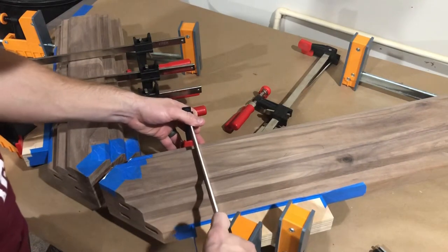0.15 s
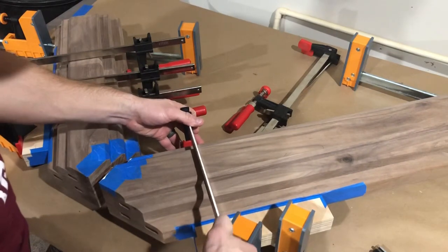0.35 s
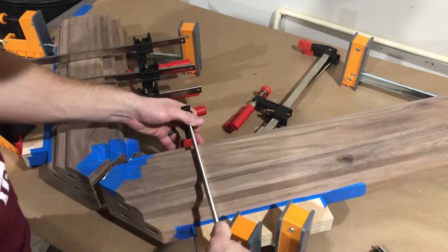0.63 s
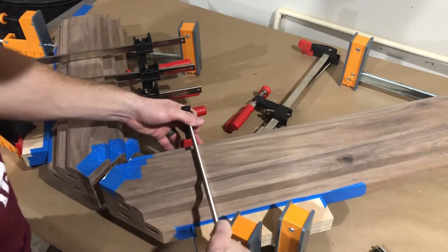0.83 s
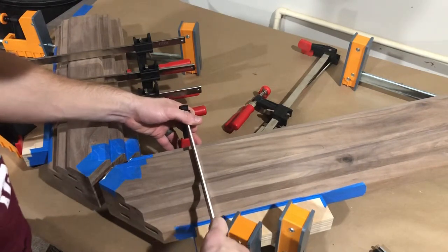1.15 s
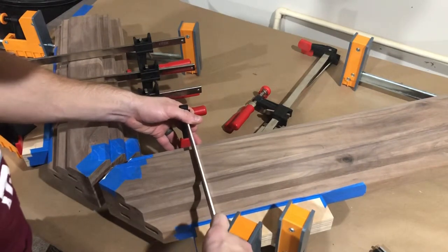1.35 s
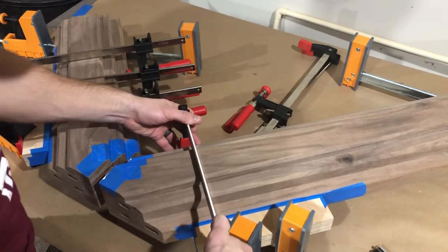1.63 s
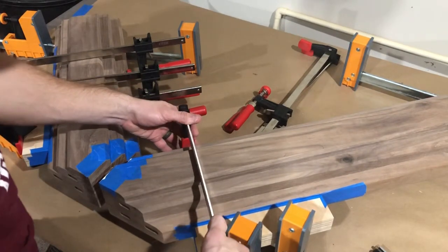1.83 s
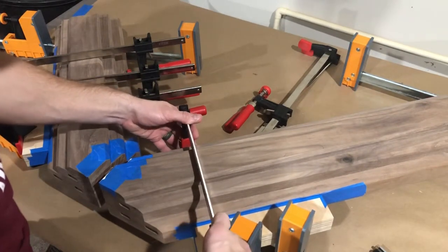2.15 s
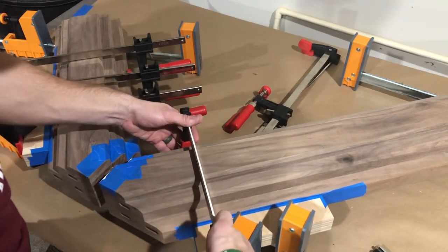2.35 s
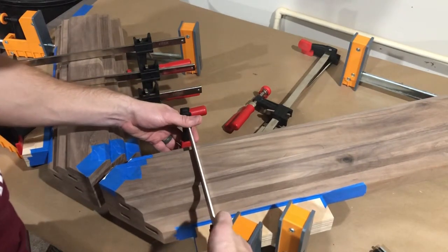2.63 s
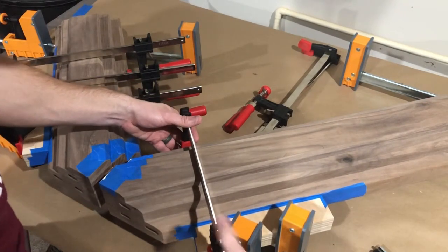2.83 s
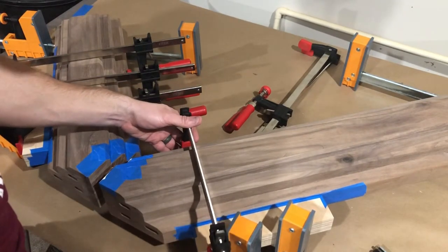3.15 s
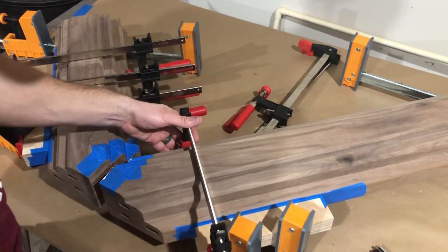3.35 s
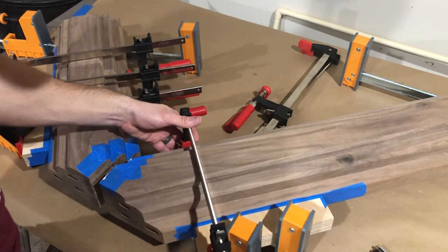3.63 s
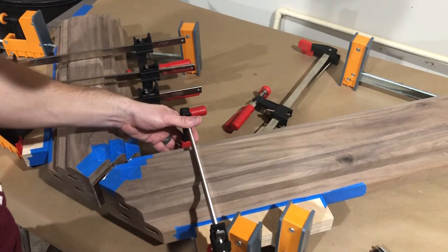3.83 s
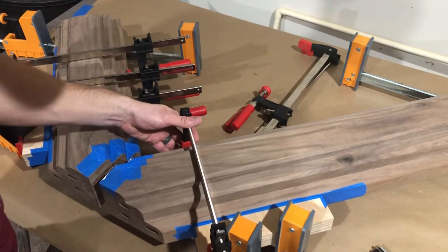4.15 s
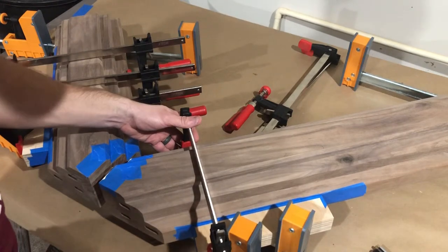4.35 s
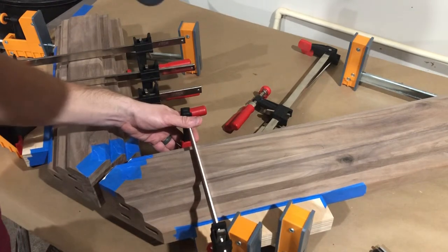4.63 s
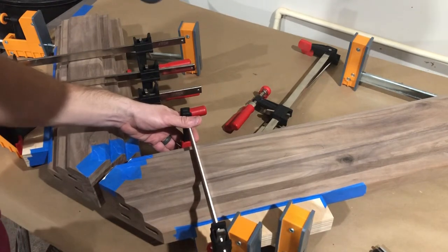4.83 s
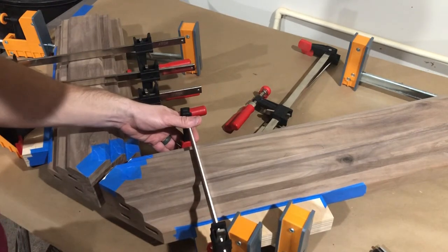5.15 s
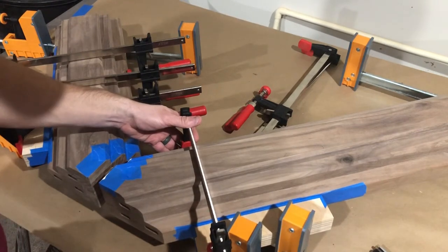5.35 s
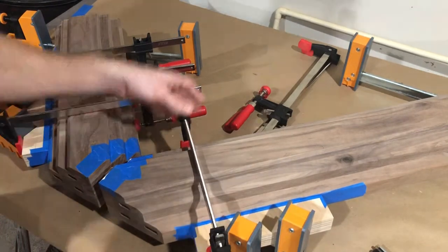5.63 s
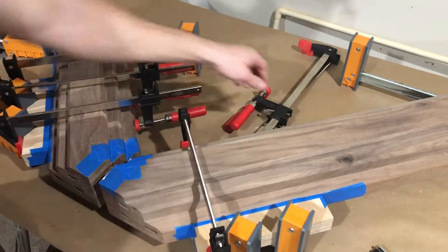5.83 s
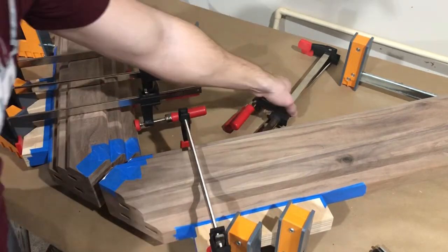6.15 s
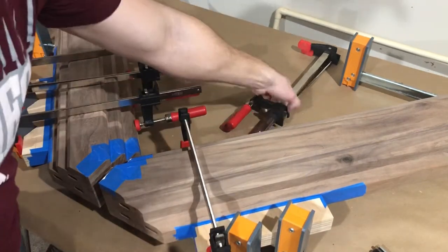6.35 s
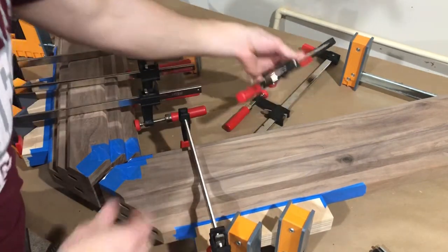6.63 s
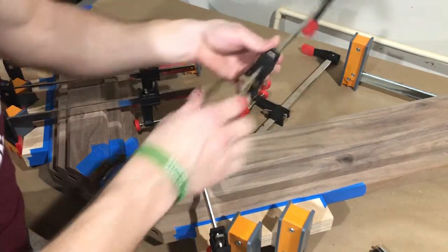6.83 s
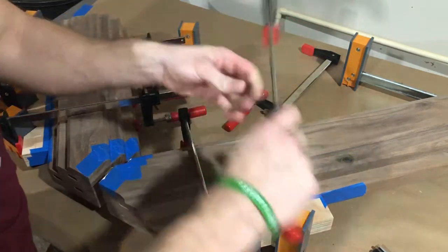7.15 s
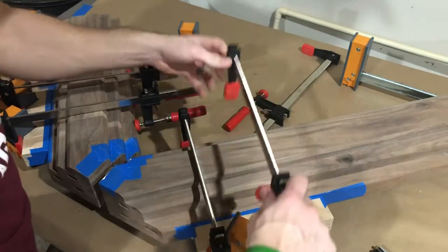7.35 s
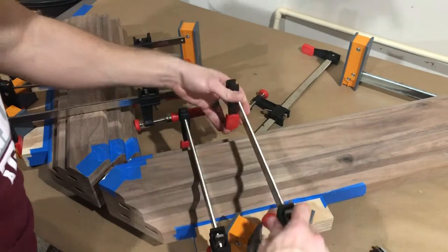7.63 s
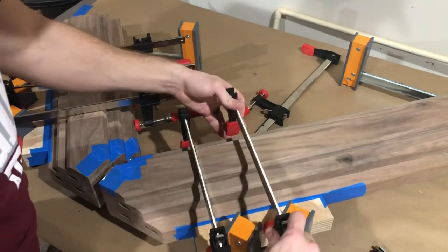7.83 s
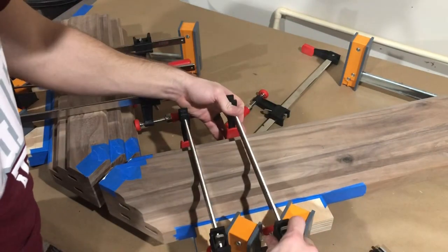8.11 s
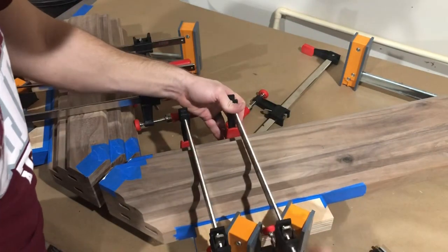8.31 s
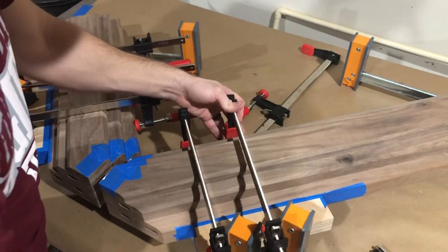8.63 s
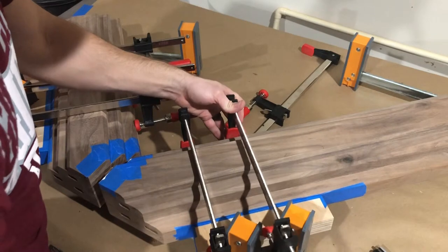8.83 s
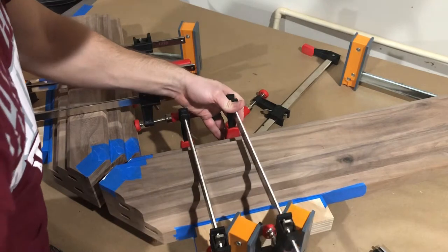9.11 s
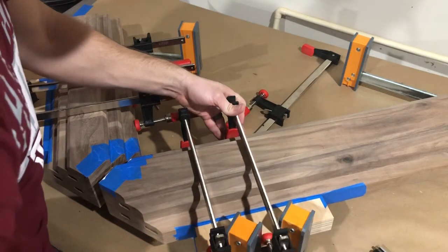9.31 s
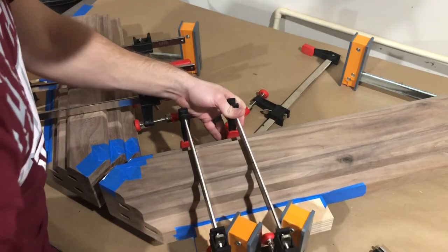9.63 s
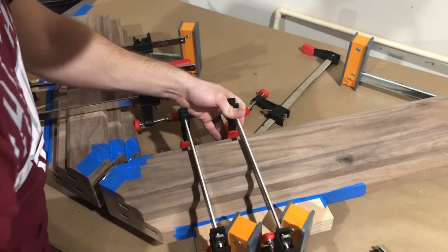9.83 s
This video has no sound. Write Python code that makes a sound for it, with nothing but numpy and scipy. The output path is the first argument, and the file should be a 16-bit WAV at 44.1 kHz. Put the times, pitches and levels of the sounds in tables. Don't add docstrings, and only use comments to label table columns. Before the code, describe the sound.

Close clamp handling on a workbench: steel clicks, woody thuds, a tearing scrape, bright ratchet snaps and brief screw chirps in a reverberant shop.

```python
import sys
import numpy as np
from scipy import signal
from scipy.fft import rfft, irfft
from scipy.io import wavfile
from scipy.ndimage import uniform_filter1d

SR = 44100
rng = np.random.default_rng(int(sys.argv[2]) if len(sys.argv) > 2 else 0)


def to_linear_factor(level_db):
    exponent = np.asarray(level_db, float) / 20
    return 10 ** exponent


def persist_wave(psi):
    counts = np.round(np.clip(psi, -1, 1) * 32767).astype(np.int16)
    wavfile.write(sys.argv[1], SR, np.atleast_2d(counts).T)


N = 440118
BLOW_SAMPLES, LEAD_SAMPLES = 16384, 512


def colour(x, points):
    hz, db = np.transpose(points)
    f_hz = np.maximum(np.fft.rfftfreq(len(x), 1 / SR), 1)
    gain = to_linear_factor(np.interp(np.log(f_hz), np.log(hz), db))
    y = irfft(rfft(x) * gain, len(x))
    return y / np.sqrt(np.mean(y ** 2))


def curve(points):
    t_s, db = np.transpose(points)
    return to_linear_factor(np.interp(np.arange(N) / SR, t_s, db, left=-200, right=-200))


def swells(moves, fade):
    t_s = np.arange(0, N + 64, 64) / SR
    peak_s, db, rise_s = np.transpose(moves)[:, :, None]
    late = (t_s - peak_s) / np.maximum(rise_s, .005)
    fall_db = 20 * np.maximum(-late, late / fade)
    return np.interp(np.arange(N) / SR, t_s, to_linear_factor(db - fall_db).sum(axis=0))


def walk(rate_hz):
    hold = int(SR / rate_hz)
    steps = np.repeat(rng.standard_normal(N // hold + 1), hold)
    return 1.3 * uniform_filter1d(uniform_filter1d(steps, hold), hold)[:N]


def grit(rate_hz, spread_db):
    slips = (rng.random(N) < rate_hz / SR) * rng.standard_normal(N)
    return slips * to_linear_factor(spread_db * np.minimum(rng.exponential(size=N), 3))


def resonate(x, peaks):
    y = 0
    for hz, width_hz, db in peaks:
        b, a = signal.iirpeak(hz, hz / width_hz, SR)
        y = y + to_linear_factor(db) * signal.lfilter(b, a, x) / np.sqrt(width_hz)
    return y / y.std()


def rings(modes, chance, scatter_db):
    hz, db, t60_s = np.transpose(modes)[:, :, None]
    jw = 2j * np.pi * np.fft.rfftfreq(BLOW_SAMPLES, 1 / SR)
    loss = np.log(1000) / t60_s
    strength = to_linear_factor(db + scatter_db * chance[:len(modes), None])
    gain = strength * np.sign(chance[-len(modes):, None])
    w = 2 * np.pi * hz
    return np.sum(gain * w / ((jw + loss) ** 2 + w ** 2), axis=0)


def burst(noise, shape):
    spectrum = rfft(noise * np.sqrt(shape))
    even = irfft(spectrum / np.abs(spectrum)) * np.sqrt(shape)
    return even / np.sqrt(np.sum(even ** 2) / np.sum(shape ** 2))


def add(out, t_s, sound, db, hold_s):
    sound = np.roll(sound, LEAD_SAMPLES) * np.clip(np.linspace(4, -.2, BLOW_SAMPLES), 0, 1)
    top = np.sqrt(uniform_filter1d(sound ** 2, int(hold_s * SR)).max())
    i = int(t_s * SR) - LEAD_SAMPLES
    out[i:i + len(sound)] += (sound * to_linear_factor(db) / top)[:N - i]


# f/Hz, level/dB per Hz
AIR_COLOUR = [(25, -6.5), (48, -1), (70, 2.5), (349, -7.5), (553, -12), (1980, -26), (15200, -33),
              (16500, -45)]


def air():
    return to_linear_factor(-65 + 1.0 * walk(1.5)) * colour(rng.standard_normal(N), AIR_COLOUR)


# f/Hz, level/dB, t60/s
BENCH_MODES = [(65.1, 2.5, 0.7), (146.2, -6.5, 0.17), (232, -4, 0.14), (315.5, -8, 0.082),
               (355, 1.5, 0.083), (468, 5, 0.03), (544.3, -3, 0.075), (625.6, 2, 0.053), (719, -1, 0.054),
               (817.4, -9.5, 0.086), (908, -4, 0.058), (1027, -10, 0.033), (1202, -7.5, 0.055),
               (1382, -6.5, 0.055)]
# peak t/s, level/dB, 20 dB swell/s
RUMBLES = [(0.01, -53.5, 0.13), (.47, -61.5, 0.3), (.66, -66, -0.2), (1.1, -65, 0.1), (1.55, -65.5, 0.76),
           (2.2, -52, -0.47), (2.4, -49, -0.0165), (2.75, -55, -0.32), (3.35, -57, 0.2), (4.14, -57.5, 0.14),
           (4.72, -44.5, 0.09), (5.39, -62, 0.28), (5.98, -51.5, 0.02), (6.25, -53, 0.18),
           (6.45, -47.5, 0.1042), (7.09, -56, -1.62), (7.34, -61, 0.26), (8.02, -43, -0.08),
           (8.73, -57, -0.3), (8.84, -49, 0), (9.39, -61.5, 0.6), (9.67, -52, -0.05)]
# peak t/s, level/dB, 20 dB swell/s
BRUSHES = [(0.01, -66.5, 0.25), (.47, -66, -0.3), (.64, -71.5, -0.87), (1.15, -86, .5), (1.61, -70, 0.33),
           (2.43, -54.5, 0.16), (3.4, -75, 0.46), (3.62, -85.5, 2.3), (4.14, -73.5, 0.3),
           (4.6, -73.5, 0.16), (4.78, -74.5, 0.27), (5.4, -73, 0.1), (6.05, -48, 0.13), (6.25, -68.5, 0.63),
           (6.5, -80, 0.3), (6.78, -70.5, 0.2), (6.9, -68, 0.44), (7.32, -64, 0.35), (8.12, -72.5, 0.3),
           (8.78, -63, 0.1), (9.1, -66, .15), (9.39, -69, 0.55), (9.68, -73, 0), (9.97, -83, 0.7)]
# f/Hz, level/dB per Hz
RUSTLE_COLOUR = [(470, -34), (800, 3), (2180, -2), (4080, -3.5), (7080, -7.5), (15000, -16), (16000, -16)]


def hands():
    modes = BENCH_MODES[1:]
    body = irfft(rings(modes, np.ones(len(modes)), scatter_db=0))
    pushes = colour(grit(500, spread_db=1.5), [(60, -13.0), (150, 1.5), (500, -6.5), (1500, -18.5)])
    rumble = signal.fftconvolve(pushes, body)[:N]
    rustle = colour(grit(8000, spread_db=-3.0), RUSTLE_COLOUR) * to_linear_factor(1.6 * walk(25))
    rumbling = swells(RUMBLES, fade=1.77) * rumble / rumble.std()
    return rumbling + swells(BRUSHES, fade=1.1) * rustle


# t/s, peak level/dB, ring f/Hz, rattle/s
CLICKS = [(0.054, -49, 6140, 0.0015), (0.0575, -52, 6000, 0.0089), (0.346, -42.5, 6000, 0.017),
          (0.4256, -42, 3500, 0.006), (0.437, -43.5, 7530, 0.011), (2.963, -79, 4370, .004),
          (4.361, -52, 4820, 0.0019), (4.68, -55, 5840, 0.002), (4.9385, -63, 9000, 0.0034),
          (5.345, -65, 3950, 0.052), (5.821, -52, 8030, 0.0043), (5.8565, -45, 2560, 0.0017),
          (5.9634, -37, 2580, 0.0034), (6.2274, -37, 8200, 0.0046), (7.191, -52.5, 4300, 0.0044),
          (7.2359, -41.5, 8000, 0.0077), (7.241, -42, 6130, 0.0057), (7.28, -40, 6700, 0.0076),
          (7.293, -49.5, 6300, 0.0067), (8.063, -45, 4500, 0.022), (8.457, -69, 9000, .015),
          (8.7238, -36, 7040, 0.002), (8.764, -42.5, 6160, 0.0023), (8.8205, -44, 4000, 0.004),
          (8.8262, -56, 11400, 0.0021), (9.053, -47.5, 5590, 0.00098)]
# t/s, peak level/dB, ring f/Hz, rattle/s, brightness/dB
SNAPS = [(0.3165, -26.5, 5480, 0.011, 2.5), (1.438, -39.5, 8450, 0.004, 1),
         (4.649, -29.5, 1310, 0.0038, -19), (7.957, -44.5, 1900, 0.0092, -37),
         (7.9683, -26.5, 6500, 0.0032, 6.5), (7.969, -63, 15000, 0.0039, 22),
         (7.9768, -22.5, 5830, 0.0027, 5.5), (8.675, -27.5, 9000, 0.0045, 6.5),
         (8.7188, -36, 6100, 0.003, 1.5), (9.0659, -27, 7600, 0.0012, 6), (9.2773, -40, 7000, 0.007, -3.5),
         (9.2945, -28, 4200, 0.0012, 1.5), (9.5053, -29, 6740, 0.0038, -3.5)]
# t/s, peak level/dB, ring f/Hz
TICKS = [(1.159, -64, 2560), (2.149, -66, 4200), (2.1564, -60.5, 5170), (3.2064, -64.5, 3200),
         (3.283, -56.5, 4130), (3.4094, -64, 5440), (4.0812, -60, 2720), (4.096, -59, 2740),
         (4.105, -58, 2740), (4.12, -62, 2550), (4.227, -69, 2530), (6.4718, -50, 5830),
         (6.7338, -56, 3320), (7.0476, -51, 4180), (7.133, -54, 3250), (7.1476, -49.5, 4500),
         (7.4825, -57.5, 4500), (7.73, -63, 2520), (8.998, -58, 5630)]
# t/s, peak level/dB, ring f/Hz, rattle/s, brightness/dB
FLECKS = [(5.8700, -42, 3060, .003, 1), (5.8768, -41.5, 2700, .003, 1), (5.8883, -34.5, 3280, .003, 2),
          (5.8955, -36.5, 2400, .004, -3), (5.974, -39, 6500, .002, 0), (5.829, -55, 1920, .003, -6),
          (5.70, -73, 8000, .05, 7), (5.728, -68, 7700, .004, 4), (3.6157, -73, 14000, .01, 8),
          (3.8537, -70, 14000, .01, 8), (4.0392, -67, 13100, .01, 6), (4.2019, -69, 8870, .03, 6),
          (4.7771, -68, 3760, .004, 0), (6.4054, -59, 4260, .004, -5), (6.5126, -60, 2600, 0.0042, -7),
          (6.612, -59, 6200, .005, -5), (6.798, -60, 4000, .004, 2), (6.9142, -60, 3220, .004, -2),
          (7.1148, -58, 2690, .004, -4), (7.164, -58, 4500, .004, -3), (9.017, -61, 4000, 0.0028, -3),
          (9.269, -56, 3000, .006, -5), (2.312, -46, 6000, .006, 2), (2.331, -34.5, 8000, .004, 3),
          (8.728, -38, 7200, .006, 3), (7.984, -42, 1800, .004, -8), (8.658, -62, 1800, .01, -15),
          (5.35, -66, 9000, .03, 6)]
# f/Hz, level/dB, t60/s
BAR_MODES = [(2220, -6.5, 0.075), (3660, 17, 0.03), (4430, -24, .12), (5240, -4.5, .12), (5460, -10, 0.056),
             (5740, 5.5, 0.27), (7084, 8, .1), (7510, 23.5, 0.029), (8350, 3, 0.27), (8600, -3, 0.082),
             (10300, -11, .12), (12200, 7, 0.067), (13570, -5.5, 0.125)]


def clicks():
    rows = SNAPS + FLECKS
    rows = rows + [(*row, -4) for row in CLICKS]
    rows = rows + [(*row, 0.0053, -7.5) for row in TICKS]
    out, t_s = np.zeros(N), np.arange(BLOW_SAMPLES) / SR
    log_f = np.log(np.fft.rfftfreq(BLOW_SAMPLES, 1 / SR) + 1)
    tilt_f = np.log([500, 2000, 5000, 12000, 17000])
    for start_s, db, hz, rattle_s, bright_db in rows:
        noise, luck = rng.standard_normal(BLOW_SAMPLES), rng.standard_normal(40)
        rattle = burst(noise, np.exp(-t_s / max(rattle_s / 2, 1e-4)) * (1 - np.exp(-t_s / .0003)))
        rattle[12] += 1.6
        tilt_db = [-16.5 - bright_db, -2 - bright_db, 0, bright_db - 7, bright_db - 10]
        tilt = to_linear_factor(np.interp(log_f, tilt_f, tilt_db))
        crack = 1 + 1.23 * np.exp(-((log_f - np.log(hz)) / 0.28) ** 2)
        local = rings([(hz, 73.5, 0.0051)], np.ones(1), scatter_db=0)
        near = np.exp(-((log_f - np.log(hz)) / 1.7) ** 2) + 1.1
        bar = to_linear_factor(33.5) * near * rings(BAR_MODES, luck, scatter_db=2)
        sound = irfft(rfft(rattle) * tilt * (crack + local + bar))
        add(out, start_s - .0005, sound, db, hold_s=.002)
    return out


# t/s, peak level/dB, f/Hz, t60/s
CHINKS = [(0.318, -37.5, 7500, .04), (6.2266, -51, 7650, .03), (6.441, -52, 5620, 0.026),
          (6.472, -46.5, 5550, 0.026), (6.471, -51, 8200, 0.024), (7.243, -49, 5700, 0.037),
          (7.281, -48, 6300, .04), (8.652, -71, 8200, 0.013), (8.6742, -22.5, 8300, 0.015),
          (8.674, -31, 5730, 0.018), (8.72, -37, 5950, 0.036), (8.726, -37, 7270, .02),
          (9.3003, -39, 4030, 0.0071), (9.506, -31, 212, .09), (9.502, -28.5, 740, 0.014),
          (3.208, -51, 1274, 0.066), (3.284, -52.5, 926, 0.054), (8.592, -48.5, 608, 0.032),
          (4.651, -40, 1400, 0.043), (.319, -44.5, 910, 0.033)]
# t/s, peak level/dB, f/Hz, t60/s
PINGS = [(2.296, -44, 11400, .05), (2.311, -45, 11400, .05), (2.321, -40, 13300, .08),
         (9.0659, -32, 11700, .005), (9.07, -47.5, 759, 0.028), (9.2945, -38, 6300, .004),
         (9.504, -46.5, 9300, 0.068), (9.504, -48, 10200, 0.073), (6.735, -61, 2200, .03),
         (3.283, -61.5, 7200, 0.034), (0.054, -58.5, 1800, .05), (1.253, -69, 5700, .012),
         (6.515, -49, 585, 0.065), (7.282, -48, 7000, .06), (.33, -47, 800, 0.046), (.352, -46, 605, .06),
         (9.525, -42, 640, .05), (2.346, -37, 720, .06), (8.826, -44, 11800, .006),
         (9.277, -42, 11500, .012), (7.968, -36, 14500, .012), (8.6745, -36, 13600, .005),
         (8.738, -47, 860, .05), (8.81, -50, 860, .05), (.318, -46, 8600, .1), (.318, -47, 10400, .1),
         (.4265, -50, 7500, .12), (7.977, -38, 14700, .015), (4.655, -50, 1800, .03),
         (9.053, -54, 5600, .012), (6.2255, -46, 11900, .02), (.648, -58, 900, .03), (.67, -55, 330, .08),
         (.71, -56, 600, .05), (1.455, -54, 600, .06), (1.48, -56, 350, .07), (9.29, -52, 750, .05),
         (7.24, -50, 12500, .01), (7.28, -50, 12500, .01), (4.36, -60, 14000, .006), (2.45, -48, 290, .1)]


def chinks():
    out = np.zeros(N)
    for rows, split in ((CHINKS, 0.036), (PINGS, 0.012)):
        for start_s, db, hz, t60_s in rows:
            luck = rng.standard_normal(12)
            cluster = [(hz * (1 + split * step), 0, t60_s) for step in luck[4:8]]
            add(out, start_s, irfft(rings(cluster, luck, scatter_db=2)), db, hold_s=.002)
    return out


# f/Hz, t60/s
SHOP_T60 = [(100, 0.74), (400, 0.75), (1500, 0.71), (5000, 0.54), (9000, 0.42), (12000, .36), (15500, 0.3)]


def shop():
    t_s, (hz, t60_s), tail = np.arange(SR) / SR, np.transpose(SHOP_T60), 0
    octave = np.log2(np.fft.rfftfreq(SR, 1 / SR) + 1)
    echoes = rfft(rng.standard_normal(SR))
    for centre in np.arange(5, 15, .5):
        band = irfft(echoes * np.clip(1 - 2 * np.abs(octave - centre), 0, 1))
        tail = tail + band * to_linear_factor(-60 * t_s / np.interp(centre, np.log2(hz), t60_s))
    gap_s = 0.0026
    tail = tail * np.clip(t_s / gap_s - 1, 0, 1)
    return to_linear_factor(-8) * tail / np.sqrt(np.sum(tail ** 2))


# t/s, peak level/dB, ring f/Hz, hardness/dB
KNOCKS = [(0.318, -43, 433, 6), (0.357, -45, 625, 0), (0.648, -50, 610, -15.5), (0.69, -53.5, 341, -17),
          (1.45, -51, 216, -0.5), (2.157, -51.5, 610, 18), (2.297, -43.5, 596, -1), (2.346, -29, 600, -23),
          (2.388, -34.5, 355, -24), (3.209, -47, 652, -7), (3.324, -49, 238, -12), (4.097, -51.5, 148, -2),
          (4.652, -30.5, 912, -7.5), (4.69, -43.5, 154, -11), (5.34, -61.5, 264, 20.5),
          (7.982, -36.5, 149, -18.5), (8.077, -39, 302, -16.5), (8.594, -47, 350, -15),
          (8.685, -43, 497, -2.5), (8.736, -41, 545, 0), (8.769, -47, 670, 1), (8.81, -50, 350, 1),
          (8.859, -56, 790, -8), (9.076, -47, 484, -2.5), (9.284, -49, 532, -7), (9.503, -35.5, 479, -6),
          (9.722, -47, 237, -2)]
# t/s, peak level/dB, ring f/Hz, leg thump/dB
BUMPS = [(1.16, -59.5, 380, -8), (1.576, -56.5, 620, -22), (3.715, -65.5, 143, -1),
         (3.917, -51.5, 206, -12), (4.227, -64, 123, 2.5), (4.538, -46, 212, -8.5),
         (5.146, -58.5, 168, -16), (6.176, -46, 131, -15), (6.235, -48.5, 244, -29),
         (6.31, -43.5, 147, -40), (6.354, -42.5, 278, -31), (6.431, -45, 287, -32),
         (6.514, -42.5, 265, -16), (7.733, -56, 356, -15), (7.96, -44.5, 358, -8), (6.09, -48, 138, -23),
         (6.545, -45, 140, -28), (6.325, -46, 191, -30), (6.385, -46, 240, -30), (7.15, -57.5, 350, -20),
         (9.525, -39, 195, -30), (9.675, -45.5, 200, -30), (6.46, -48, 300, -30)]


def knocks():
    out, t_s = np.zeros(N), np.arange(BLOW_SAMPLES) / SR
    log_f = np.log(np.fft.rfftfreq(BLOW_SAMPLES, 1 / SR) + 1)
    tilt_f = np.log([35, 75, 160, 400, 1000, 3000])
    # t/s, level/dB, f/Hz, hardness/dB, leg thump/dB, push/s
    rows = [(s, db, hz, hard_db, -27 - 0.4 * (db + 45), 0.00023) for s, db, hz, hard_db in KNOCKS]
    rows += [(s, db, hz, -21, legs_db, 0.00028) for s, db, hz, legs_db in BUMPS]
    for start_s, db, hz, hard_db, legs_db, push_s in rows:
        noise, luck = rng.standard_normal(BLOW_SAMPLES), rng.standard_normal(40)
        push = t_s * np.exp(-t_s / push_s)
        tilt_db = [legs_db - 20, legs_db, 0, 0, hard_db + 13.0, hard_db + 7.5]
        tilt = to_linear_factor(np.interp(log_f, tilt_f, tilt_db))
        thud = to_linear_factor(-83.5) * rfft(burst(noise, np.exp(-t_s / 0.025)))
        spot = rings([(hz, 12.5, .05)], luck, scatter_db=0)
        bench = rings(BENCH_MODES, luck, scatter_db=3)
        ring = irfft(rfft(push) * tilt * (bench + spot + thud))
        spread_s = 0.0017
        add(out, start_s, ring * (1 - np.exp(-t_s / spread_s)), db, hold_s=.006)
    return out


# t/s, level/dB
SLIDE = [
    (2.282, -84),
    (2.297, -43),
    (2.305, -57),
    (2.321, -39),
    (2.326, -47),
    (2.331, -35),
    (2.34, -32.5),
    (2.348, -33),
    (2.356, -52),
]
# f/Hz, width/Hz, level/dB
SLIDE_RINGS = [(3200, 900, -6.5), (4500, 2300, 3.5), (9000, 5500, -1.5)]


def slide():
    return curve(SLIDE) * resonate(grit(9000, spread_db=3.0), SLIDE_RINGS)


# t/s, level/dB
SCRAPE = [
    (5.78, -72.5),
    (5.824, -57),
    (5.842, -58),
    (5.868, -51.5),
    (5.9, -37),
    (5.932, -43),
    (5.982, -32.5),
    (6.002, -40.5),
    (6.08, -58),
]
# f/Hz, level/dB per Hz
SCRAPE_COLOUR = [(410, -19), (1060, -12), (1170, -3.5), (1440, -4), (2160, -0.5), (3840, -10), (7490, -10),
                 (16000, -15.5)]


def scrape():
    return curve(SCRAPE) * to_linear_factor(2.2 * walk(90)) * colour(grit(12000, spread_db=0.7), SCRAPE_COLOUR)


# t/s, level/dB
CARRY = [
    (6.1, -64),
    (6.352, -66.5),
    (6.63, -69.5),
    (6.695, -79),
    (6.76, -67.5),
    (6.95, -68.5),
    (7.07, -75),
    (7.344, -59),
    (7.54, -90),
]
# f/Hz, width/Hz, level/dB
CARRY_RINGS = [(3400, 700, -4.5), (4340, 700, -1), (7100, 600, -9.5)]


def carry():
    patch, rub, hiss = walk(12), grit(6000, spread_db=1.5), 0
    for k, ring in enumerate(CARRY_RINGS):
        level_db = ring[2] + 3.5 * np.roll(patch, k * SR)
        hiss = hiss + to_linear_factor(level_db) * resonate(rub, [ring])
    return curve(CARRY) * hiss


# t/s, level/dB
CHATTER = [
    (8.68, -70),
    (8.70, -52),
    (8.76, -52),
    (8.86, -55),
    (8.93, -59),
    (9.0, -75),
]
# f/Hz, width/Hz, level/dB
CHATTER_RINGS = [(350, 120, -3), (620, 110, .5), (850, 120, .5)]


def chatter():
    return curve(CHATTER) * resonate(grit(700, spread_db=2.5), CHATTER_RINGS)


# middle t/s, peak level/dB, start f/Hz, end f/Hz, length/s
SQUEAKS = [
    (9.6428, -26.5, 5630, 5590, .010),
    (9.656, -24.5, 5450, 5850, .008),
    (9.664, -29, 5720, 5760, .008),
    (9.686, -38, 5750, 5750, .007),
    (9.7, -17.5, 5700, 5400, .010),
    (9.7062, -17.5, 5480, 5950, .014),
    (9.8, -42, 5600, 5660, .009),
]


def squeaks():
    first = int(9.6 * SR)
    out, t_s = np.zeros(N), np.arange(first, N) / SR
    loudest_db = max(row[1] for row in SQUEAKS)
    for mid_s, db, start_hz, end_hz, length_s in SQUEAKS:
        u = np.clip((t_s - mid_s) / length_s + .5, 0, 1)
        phase = 2 * np.pi * np.cumsum(start_hz + (end_hz - start_hz) * u) / SR
        drive = length_s / .011
        swell = np.tanh(drive * np.sin(np.pi * u) ** 2) / np.tanh(drive)
        octave_db = -15.5 + .9 * (db - loudest_db)
        octave = to_linear_factor(octave_db) * swell * np.sin(2 * phase)
        out[first:] += to_linear_factor(db) * swell * (np.sin(phase) + octave)
    return out


def scene():
    hum, rubs = air(), hands() + carry()
    blows = clicks() + chinks() + knocks() + slide() + scrape() + chatter()
    squeal = squeaks()
    echoes = signal.fftconvolve(blows + .75 * squeal + .5 * rubs, shop())[:N]
    treble_limit = signal.ellip(6, .3, 22, 15900, fs=SR, output="sos")
    heard = signal.sosfilt(treble_limit, blows + squeal + rubs + echoes)
    return (heard + hum)[None]


def band_limit(x):
    return signal.sosfilt(signal.butter(12, 17050, fs=SR, output="sos"), x)


def record(dry):
    mix = signal.sosfilt(signal.butter(4, 48, "high", fs=SR, output="sos"), dry)
    return band_limit(mix)


dry = scene()
out = record(dry)
persist_wave(out)
```